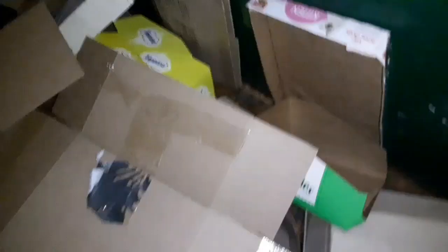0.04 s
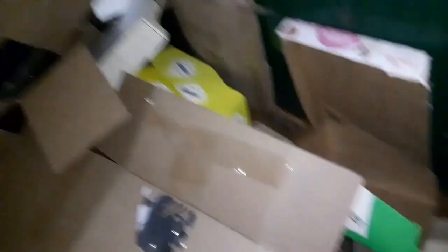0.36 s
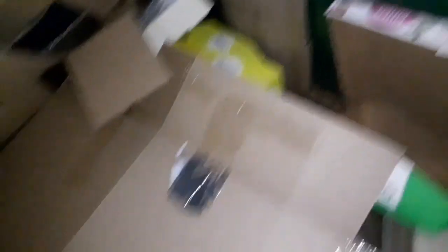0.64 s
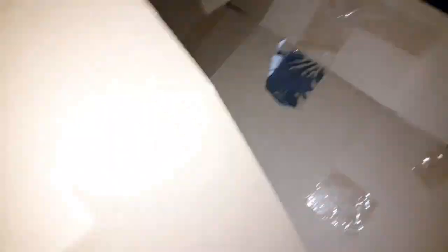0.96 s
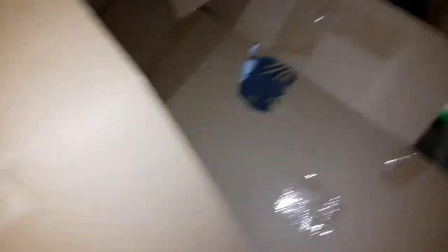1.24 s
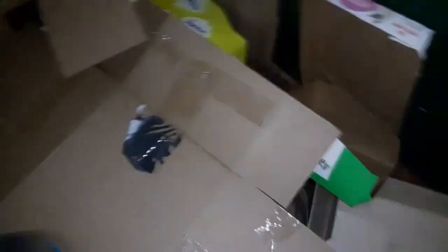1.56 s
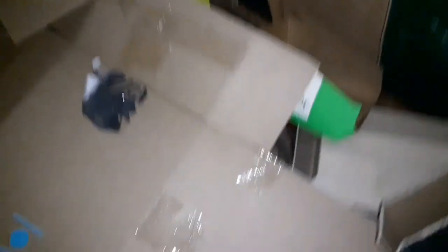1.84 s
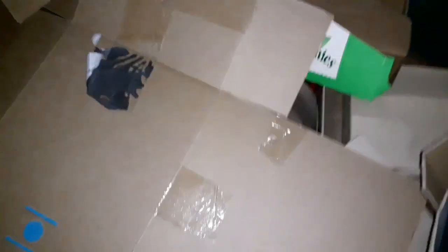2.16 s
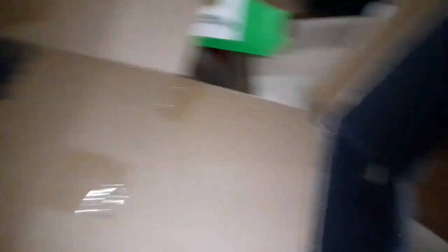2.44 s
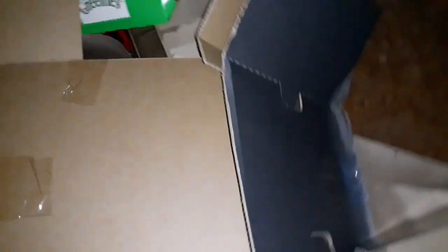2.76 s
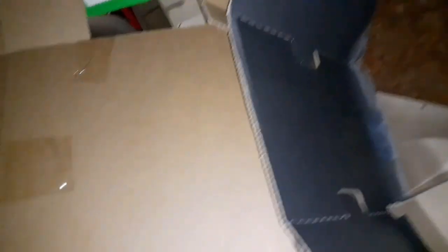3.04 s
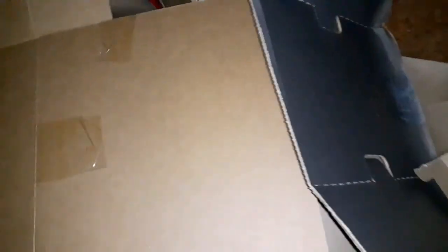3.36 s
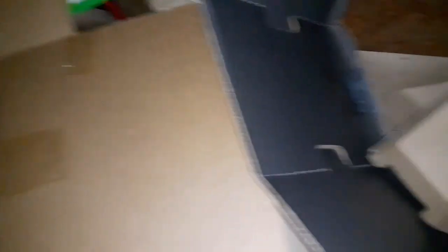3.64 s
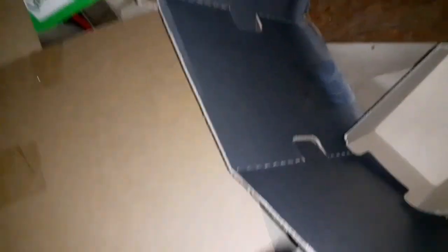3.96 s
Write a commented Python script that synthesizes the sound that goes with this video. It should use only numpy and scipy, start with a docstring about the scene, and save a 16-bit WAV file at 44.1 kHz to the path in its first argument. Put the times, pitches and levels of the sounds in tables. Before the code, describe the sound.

Cardboard boxes slide and rasp close by, slightly left, inside an echoing steel dumpster. Soft scrapes and knocks come first, and a flap slaps down at 0.7 seconds. From 1.2 seconds the dragging grows louder, with hollow knocks and snapping edges over the bin's low boom. The sound cuts out briefly at 2.3 seconds, then scraping resumes, peaking in knocks around 3.5 seconds before fading.

```python
"""A hiss and rasp of sliding cardboard, close by, over the low boom of a steel dumpster.
Boxes are dragged and shoved about inside it: tiny slips make the friction, edges snap past each
other, panels knock, short scrapes crunch and a loose flap slaps down once. The boxes lie to the
left and echo in the bin. Just past halfway the sound cuts out for a moment."""
import sys
import numpy as np
from scipy import signal
from scipy.fft import rfft, irfft
from scipy.io import wavfile
from scipy.ndimage import uniform_filter1d

SR = 44100
rng = np.random.default_rng(int(sys.argv[2]) if len(sys.argv) > 2 else 0)


def dump_mix(stems):
    """Bounce the given channels to the path in sys.argv[1] as a 16-bit WAV at rate SR."""
    frames = np.atleast_2d(stems).T  # one column per channel
    limited = np.clip(frames, -1, 1)  # hard clip at full scale
    pcm = np.round(limited * 32767).astype(np.int16)
    wavfile.write(sys.argv[1], SR, pcm)


N = 176400


def amp(db):
    return 10 ** (np.asarray(db) / 20)


def unit_rms(x):
    return x / np.sqrt(np.mean(x ** 2) + 1e-20)


def over_hz(table, hz, column=1):
    """Reads a table column along a log-frequency axis."""
    points = np.array(table, float)
    return np.interp(np.log(hz + 1), np.log(points[:, 0]), points[:, column])


def over_time(table, column=1):
    """Reads a table column at every sample."""
    points = np.array(table, float)
    return np.interp(np.arange(N) / SR, points[:, 0], points[:, column])


def add(mix, start_s, sound):
    part = mix[..., max(round(start_s * SR), 0):][..., :sound.shape[-1]]
    part += sound[..., :part.shape[-1]]


def colour(x, db_at, size=4096):
    """Minimum-phase EQ with the gain curve db_at(hz)."""
    hz = abs(np.fft.fftfreq(size, 1 / SR))
    log_gain = np.log(amp(np.maximum(db_at(hz), -90)))
    taps = np.fft.ifft(np.exp(signal.hilbert(log_gain).conj())).real
    return signal.fftconvolve(x, taps[None, :size // 2], axes=1)[:, :x.shape[1]]


def flatten(x, bins=100):
    """Evens out the broad spectrum of a ring and keeps its fine resonances."""
    spectrum = rfft(x, 2 * x.shape[1])
    broad_power = uniform_filter1d(abs(spectrum) ** 2, bins, axis=1)
    return irfft(spectrum / np.sqrt(broad_power + 1e-12))[:, :x.shape[1]]


# Reverb inside the bin: freq_hz, t60_s, stereo_coherence
BIN_REVERB = [(60, 0.29, 0.3), (140, 0.42, 0.83), (304, 0.16, 0.99), (610, 0.32, 0.49), (1310, 0.19, 0.15),
              (13500, 0.2, 0)]
# Stereo placement of the boxes: freq_hz, left_minus_right_db
BOX_PAN = [(130, -5), (280, 4.5), (1500, 0), (12000, 0.5)]
def spot_response(direct, panel_t60_s=.033, panel_db=3.5, echo_db=-4, right_lag_s=.000388, size=16384):
    """One spot on a box answers a tap: direct click, short panel ring, echoes of the bin."""
    t, hz = np.arange(size) / SR, np.fft.rfftfreq(size, 1 / SR)
    band_hz, frame_s, noise = signal.stft(rng.standard_normal((2, size)), SR, nperseg=256)
    t60_s = over_hz(BIN_REVERB, band_hz)[:, None]
    tail = signal.istft(noise * amp(-60 * frame_s / t60_s) / np.sqrt(t60_s), SR, nperseg=256)[1]
    echoes = unit_rms(tail[:, :size] * (1 - np.exp(-t / .0028)))
    panel = unit_rms(rng.standard_normal((2, size)) * amp(-60 * t / panel_t60_s))
    spectrum = rfft(flatten(amp(echo_db) * echoes + amp(panel_db) * panel))
    coherence = over_hz(BIN_REVERB, hz, column=2)
    spectrum[1] = coherence * spectrum[0] + np.sqrt(1 - coherence ** 2) * spectrum[1]
    spectrum += direct
    spectrum[1] *= np.exp(-2j * np.pi * hz * right_lag_s)
    pan = amp(np.outer([.5, -.5], over_hz(BOX_PAN, hz)))
    fade = np.clip(2 - 2 * t / t[-1], 0, 1) ** 2
    return irfft(rfft(flatten(irfft(spectrum))) * pan) * fade


def friction(tone, level, slips_per_s, spread_db=0, spots=12, spots_per_s=28, judder_db=2.5):
    """Tiny slips in juddering bursts excite a contact spot that wanders over the box."""
    t, out = np.arange(N) / SR, np.zeros((2, N))
    judder_lowpass = signal.butter(2, 50.8, fs=SR, output="sos")
    judder = unit_rms(signal.sosfilt(judder_lowpass, rng.standard_normal(N)))
    slips = rng.choice([-1, 1], N) * amp(spread_db * np.minimum(rng.exponential(1, N), 3.5))
    slips *= rng.random(N) < slips_per_s / SR
    drive = unit_rms(slips * amp(judder_db * judder)) * level
    for spot in range(spots):
        distance = (t * spots_per_s - spot + 1) % spots - 1
        crossfade = np.cos(np.pi / 2 * np.minimum(distance, 1))
        response = colour(spot_response(direct=.2), lambda hz: over_hz(tone, hz))
        response /= np.sqrt((response ** 2).sum() / 2)
        out += signal.fftconvolve((drive * crossfade)[None], response, axes=1)[:, :N]
    return out


# Level ride of the long drag: time_s, hiss_db, rasp_db
DRAG_LEVELS = [(0, -35.5, -30), (.09, -46.5, -36.5), (.44, -47, -43.5), (.5, -41.5, -34), (.6, -67, -43.5),
               (.7, -45, -40.5), (.88, -53.5, -46.5), (.98, -50.5, -41.5), (1.13, -46, -39.5),
               (1.2, -37, -30), (1.28, -29.5, -32.5), (1.35, -26, -28.5), (1.41, -41, -25),
               (1.48, -34.5, -25.5), (1.57, -33, -32.5), (1.76, -31.5, -35), (1.88, -30.5, -26.5),
               (1.98, -24.5, -22.5), (2.04, -33.5, -29.5), (2.1, -34, -29.5), (2.18, -29.5, -26),
               (2.28, -38, -33), (2.51, -38, -34.5), (2.57, -28, -26), (2.66, -45, -33.5),
               (2.69, -30.5, -29.5), (2.72, -22, -37), (2.8, -29, -27.5), (2.92, -32.5, -33),
               (3.13, -40.5, -41.5), (3.26, -36.5, -31), (3.31, -41, -38.5), (3.39, -35, -35),
               (3.45, -21.5, -35), (3.52, -41.5, -36.5), (3.59, -27.5, -19.5), (3.66, -42, -44.5),
               (3.745, -45, -45), (3.79, -61, -49.5), (3.9, -65, -57), (4, -58, -49)]
# EQ of the airy surface hiss and of the dark panel rasp: freq_hz, gain_db
HISS_TONE = [(300, -1), (1200, -1.5), (3000, -1.5), (4300, 0.5), (6500, -0.5), (10000, -2.5), (12500, 0.5),
             (16000, -7)]
RASP_TONE = [(60, -23), (150, -3.5), (350, -0.2), (750, -3.5), (1000, -5.5), (1300, -8.5), (2100, -12.5),
             (3500, -16.5), (8000, -28.5)]
def drag():
    """Sliding sheets: fine slips hiss, flaring with each short scrape, and coarse slips rasp."""
    hiss_level = amp(over_time(DRAG_LEVELS, column=1)) + scrape_envelope(column=2)
    rasp_level = amp(over_time(DRAG_LEVELS, column=2))
    hiss = friction(HISS_TONE, hiss_level, slips_per_s=5000, spread_db=2)
    rasp = friction(RASP_TONE, rasp_level, slips_per_s=900)
    return hiss + rasp


# Low modes of the steel bin: pitch_hz, relative_db, t60_s
BIN_MODES = [(59.9, -3, 0.88), (83.1, 4, 0.8), (133.6, 4.5, 0.4), (266.5, 1, 0.14)]
# Level ride of the boom: time_s, level_db
BOOM_LEVELS = [(0, -37), (1.03, -44), (1.35, -33), (3.0, -34), (3.25, -42.5), (3.65, -33.5), (3.8, -39),
               (4, -55)]
# EQ of the background rumble: freq_hz, gain_db
RUMBLE_TONE = [(15, -22), (35, -7.5), (60, 10), (150, -1.5), (2000, -42.5)]
def bin_boom(width=.11, rumble_db=-49.5):
    """The shifting load keeps the low modes of the bin ringing, over a dull rumble."""
    hz, modes = np.fft.rfftfreq(N, 1 / SR), 0
    for pitch_hz, db, t60_s in BIN_MODES:
        peak = unit_rms(1 / (1 + ((hz - pitch_hz) * t60_s / np.log(1000)) ** 2))
        modes += amp(db) * peak * np.exp(2j * np.pi * rng.random((2, len(hz))))
    mid, side = unit_rms(irfft(modes, N))
    boom = np.array([mid + width * side, mid - width * side]) * amp(over_time(BOOM_LEVELS))
    rumble = unit_rms(irfft(rfft(rng.standard_normal(N)) * amp(over_hz(RUMBLE_TONE, hz)), N))
    return (boom + amp(rumble_db) * rumble) * amp([[.5], [-.5]])  # leans slightly left


def impact(direct, panel_t60_s, crush_s=.007, second_db=-5):
    """A first contact, then a softer second one as the card gives way."""
    hit = spot_response(direct, panel_t60_s)
    add(hit, crush_s * rng.uniform(.6, 1.4), amp(second_db) * spot_response(0, panel_t60_s))
    return hit


def shape_hit(hit, level_db, db_at, attack_samples=600):
    """EQs a hit and sets the RMS level of its attack."""
    shaped = colour(hit, db_at)
    return amp(level_db) * shaped / np.sqrt(np.mean(shaped[:, :attack_samples] ** 2))


# Snap cues: start_s, level_db, treble_tilt_db_per_octave
SNAP_CUES = [(0.027, -31, -6), (0.723, -24.5, -1.5), (.922, -42, -0.5), (1.367, -26.5, -8),
             (1.452, -25, 1.5), (1.647, -17, -0.5), (1.836, -17.5, -6), (1.897, -24.5, -2.5),
             (2.206, -23, 0), (2.482, -27.5, -2.5), (2.705, -24, -5.5), (2.924, -35, -3), (3.027, -27, 4),
             (3.403, -27.5, 3), (3.448, -21, -4), (3.558, -15.5, -5), (3.57, -16, -3), (3.829, -51.5, -12),
             (3.928, -41.5, -3)]
# EQ of a snapping edge: freq_hz, gain_db
SNAP_TONE = [(150, -40.5), (700, 5), (1350, 0), (2100, 1.5), (2900, -2.5), (4300, -1), (6500, -3.5),
             (10000, -5), (12500, -2.5), (16000, -8.5)]
def edge_snaps(tilt_from_hz=2000):
    """Edges catch and let go with a bright crack."""
    out = np.zeros((2, N))
    for start_s, level_db, tilt in SNAP_CUES:
        def tone(hz):
            return over_hz(SNAP_TONE, hz) + tilt * np.log2(np.maximum(hz / tilt_from_hz, 1))
        add(out, start_s, shape_hit(impact(direct=.24, panel_t60_s=.033), level_db, tone))
    return out


# Body of the box stack, shared by every knock: pitch_hz, relative_db, t60_s
BOX_MODES = [(97.8, 17, 0.21), (134, 15.5, 0.16), (174.8, 2.5, 0.19), (270, 10, 0.12), (362.8, 8.5, 0.19),
             (786, 3, 0.037), (991, 10, 0.2)]
def hollow_ring(left_bias_db=3, size=16384):
    """The stacked boxes ring with hollow, decaying modes, louder on the left."""
    t, ring = np.arange(size) / SR, 0
    for pitch_hz, db, t60_s in BOX_MODES:
        unity_peak = 2 * np.log(1000) / (t60_s * SR)  # resonance gain independent of decay
        ring += unity_peak * amp(db - 60 * t / t60_s) * np.cos(2 * np.pi * pitch_hz * t)
    return amp(np.array([[.5], [-.5]]) * left_bias_db) * ring


# Knock cues and the band each one rings in: start_s, level_db, low_hz, high_hz
KNOCK_CUES = [(0.08, -28, 260, 480), (0.097, -29, 86.5, 166), (0.336, -34.5, 251, 450),
              (.543, -32, 242, 504), (.725, -22, 337, 465), (0.751, -26.5, 135, 379),
              (1.437, -23, 127, 357), (1.496, -25.5, 160, 730), (1.596, -16.5, 117, 163),
              (1.645, -21.5, 336, 623), (1.815, -16.5, 114, 382), (1.836, -16, 172, 720),
              (1.848, -18, 246, 540), (2.207, -19, 405, 880), (2.285, -31, 900, 985),
              (2.438, -33, 111, 936), (2.54, -20.5, 145.3, 590), (2.583, -17.5, 393, 1190),
              (2.925, -26.5, 546, 770), (2.951, -22, 262, 298), (2.964, -24, 79, 153),
              (3.355, -26, 107, 1440), (3.403, -14, 165, 495), (3.421, -24.5, 131, 314),
              (3.535, -12.5, 278, 760), (3.561, -18, 70, 590), (3.599, -21.5, 73.5, 302),
              (3.928, -30, 252, 710)]
def panel_knocks(peak_db=5, peak_octaves=.12, low_db_per_octave=16.5, high_db_per_octave=18.5):
    """Each knock drives the boxes over a band set by panel size and hardness of contact."""
    out = np.zeros((2, N))
    for start_s, level_db, low_hz, high_hz in KNOCK_CUES:
        def tone(hz):
            octaves = np.log2([low_hz / (hz + 1), (hz + 1) / high_hz])
            below, above = np.maximum(octaves, 0)
            peaks = (1 / (1 + (octaves / peak_octaves) ** 2)).max(0)  # a resonance at each band edge
            return peak_db * peaks - low_db_per_octave * below - high_db_per_octave * above
        knock = impact(direct=.17, panel_t60_s=.048) + hollow_ring()
        add(out, start_s, shape_hit(knock, level_db, tone))
    return out


# Scrape cues: start_s, length_s, hiss_db, rasp_db
SCRAPE_CUES = [(0.326, 0.11, -65, -35), (1.037, 0.06, -74, -34), (1.595, 0.023, -29, -28),
               (1.807, 0.053, -29.5, -18), (2.648, 0.037, -61, -24.5), (2.713, 0.022, -50, -18),
               (3.039, 0.043, -28.5, -33), (3.153, 0.045, -31.5, -32), (3.246, 0.028, -31, -29),
               (3.574, 0.027, -42, -23)]
def scrape_envelope(column, skew=.71):
    """Each short stroke swells quickly and fades more slowly."""
    level = np.zeros(N)
    for cue in SCRAPE_CUES:
        start_s, length_s = cue[:2]
        progress = np.linspace(0, 1, round(length_s * SR))
        add(level, start_s, amp(cue[column]) * np.sin(np.pi * progress ** skew))
    return level


# Midrange EQ of a scraping edge: freq_hz, gain_db
SCRAPE_TONE = [(200, -19.5), (650, 7.5), (1150, -1.5), (2200, -6.5), (6000, -29.5)]
def edge_scrapes():
    """An edge crunches over the card in short bursts of coarse slips."""
    return friction(SCRAPE_TONE, scrape_envelope(column=3), slips_per_s=900, spots=5)


# Modes of the loose flap: pitch_hz, level_db
FLAP_MODES = [(1310, -33), (1720, -28), (2100, -27), (2230, -28)]
def flap_slap(start_s=.723, t60_s=.11):
    """A loose flap slaps down and rings with a hollow, woody note."""
    t, out = np.arange(SR // 3) / SR, np.zeros((2, N))
    for pitch_hz, level_db in FLAP_MODES:
        partial = np.sin(2 * np.pi * (pitch_hz * t + rng.random((2, 1))))
        add(out, start_s, amp(level_db - 60 * t / t60_s) * partial)
    return out


def scene():
    return drag() + edge_scrapes() + panel_knocks() + edge_snaps() + flap_slap() + bin_boom()


def record(dry):
    """The sound drops out briefly, and a steep low-pass trims the top end."""
    mute_from_s, mute_to_s, cutoff_hz = 2.298, 2.435, 15900
    t = np.arange(N) / SR
    muted = (t > mute_from_s) & (t < mute_to_s)
    gate = np.maximum(uniform_filter1d(1. - muted, size=64), amp(-70))
    lowpass = signal.firwin(511, cutoff_hz, window=("kaiser", 9), fs=SR)
    return signal.oaconvolve(dry * gate, lowpass[None], "same")


dry = scene()
out = record(dry)
dump_mix(out)
```